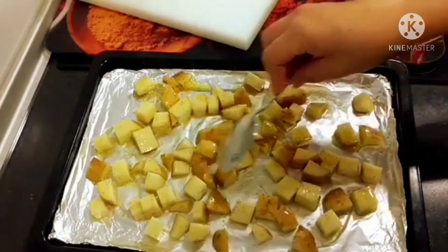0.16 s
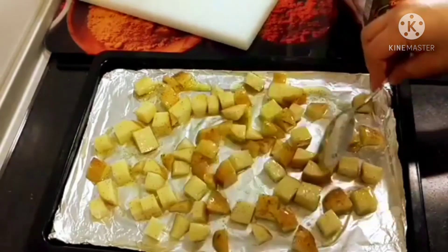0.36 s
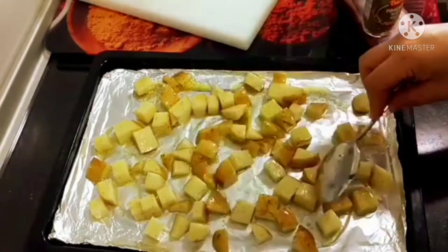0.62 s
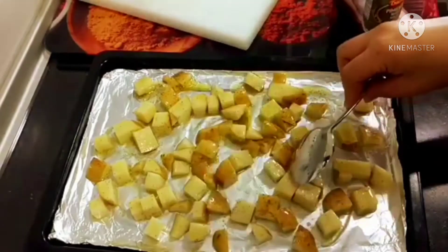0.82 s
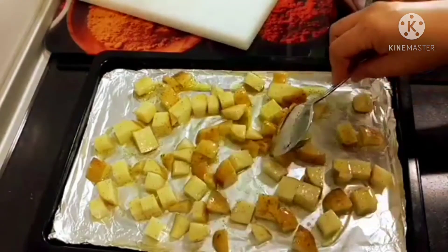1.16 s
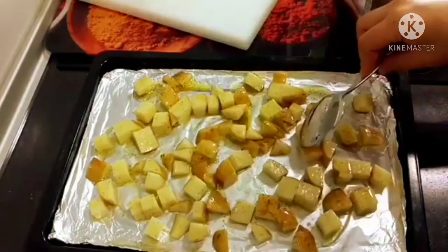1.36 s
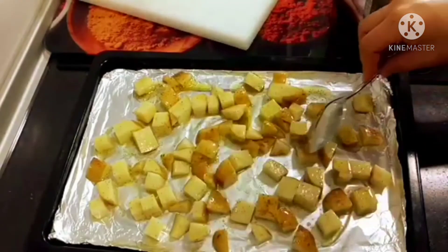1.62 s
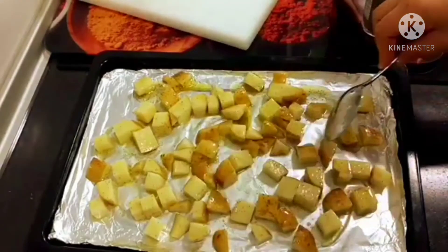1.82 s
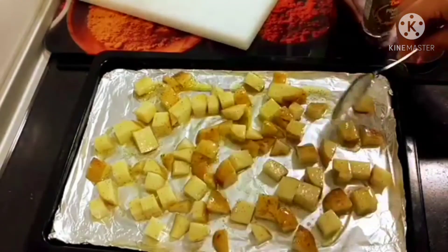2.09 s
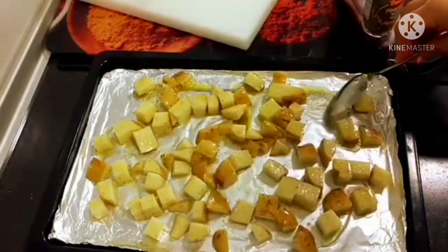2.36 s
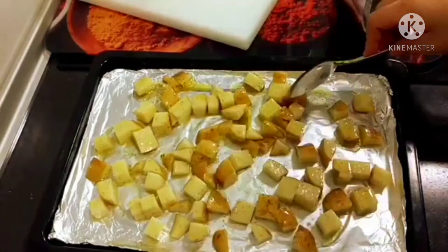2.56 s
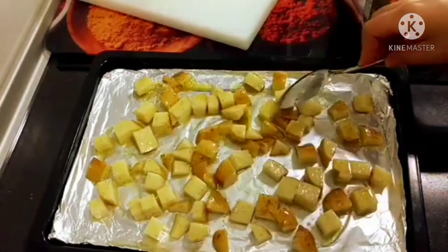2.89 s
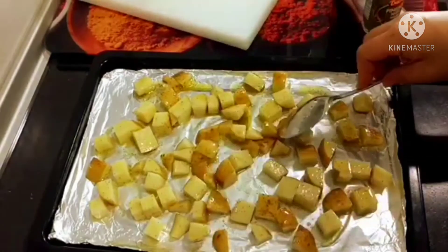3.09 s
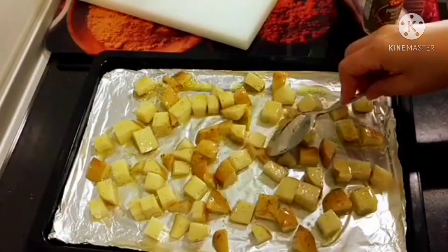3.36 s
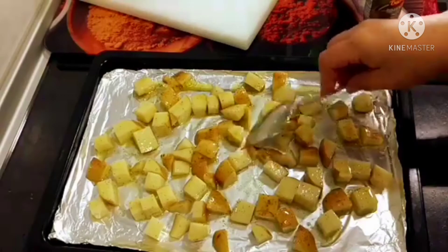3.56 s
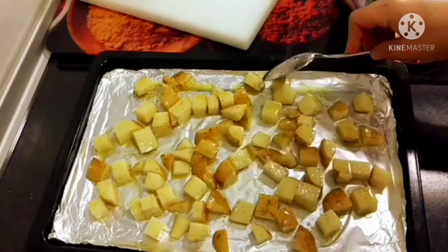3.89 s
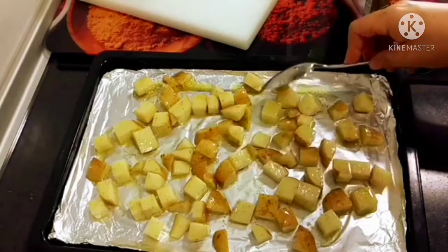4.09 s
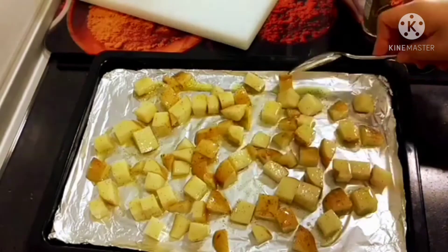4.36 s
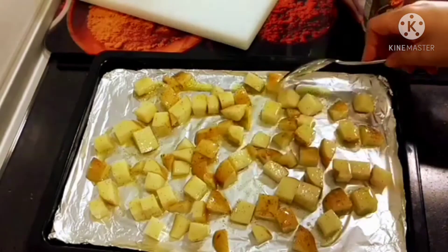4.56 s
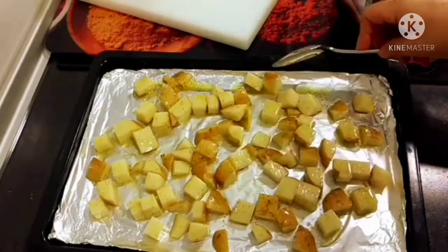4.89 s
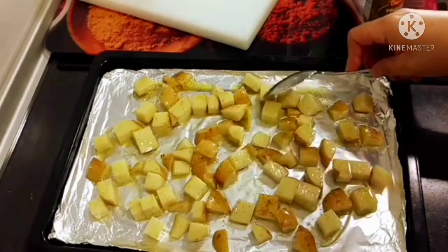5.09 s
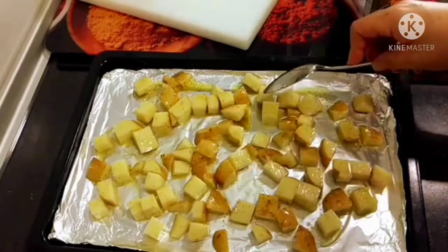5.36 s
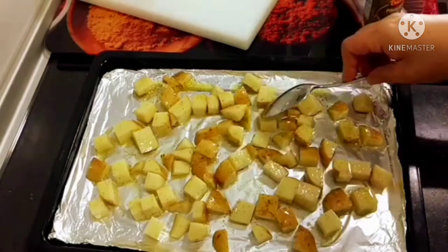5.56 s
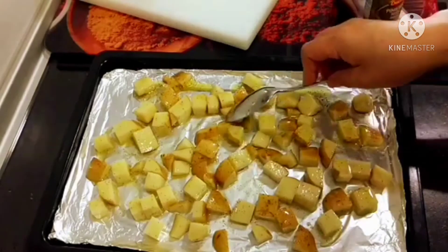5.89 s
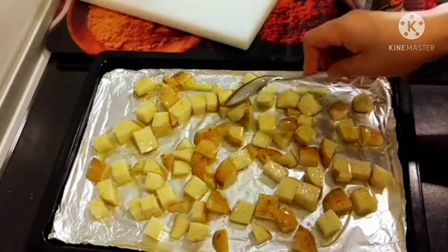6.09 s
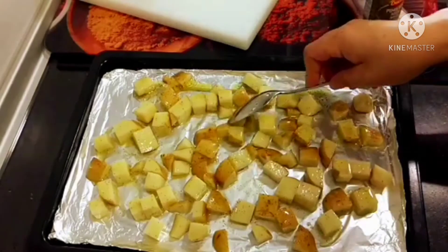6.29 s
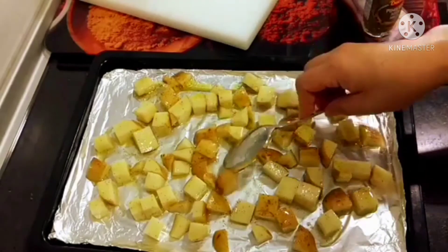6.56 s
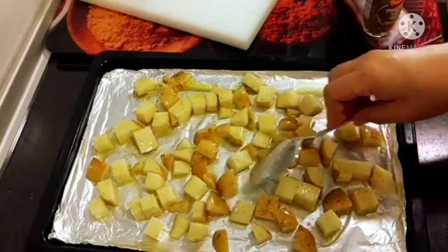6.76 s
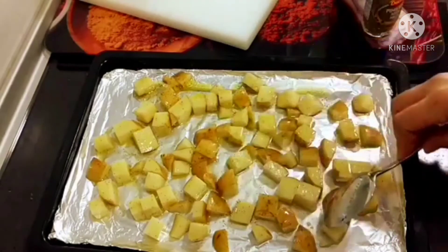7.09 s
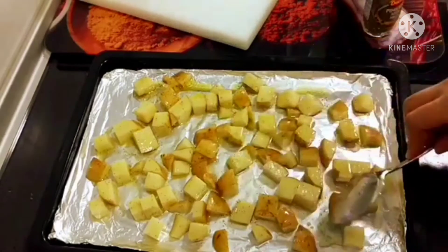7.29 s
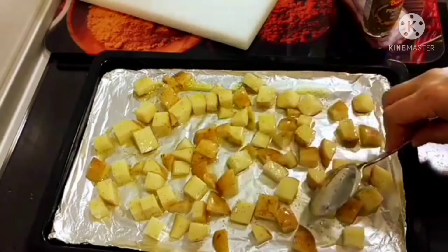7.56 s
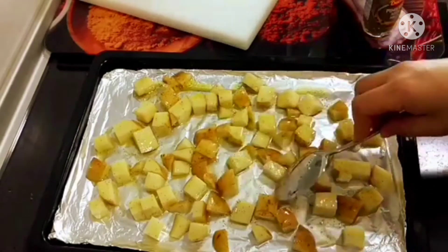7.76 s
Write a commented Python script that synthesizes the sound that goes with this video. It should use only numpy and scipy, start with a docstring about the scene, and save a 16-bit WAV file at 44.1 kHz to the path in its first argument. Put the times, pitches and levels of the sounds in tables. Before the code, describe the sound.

Hollow boomy tray knocks open, followed by irregular dull pushes, a brief judder of a sliding cube and dry foil crinkles. Foil then snaps brightly before two separate hard clacks of spoon on tray, ringing briefly with loose rattle. Faint taps follow, then a crisp foil crackle and a few last soft knocks. Close stereo pickup, short hard kitchen reverberation and low steady household hiss.

```python
"""A small, hard kitchen, a stereo microphone close to a foil-lined baking tray of potato cubes.
Over a quiet household hiss a steel spoon pushes the cubes: noise-struck modes boom, drag and knock,
while clumped grains crinkle the foil and short noise bursts snap it. Cubes judder near 1.7 s;
two sharp clacks of ringing, rattling metal follow near 4.5 and 4.9 s, within a faint thin tone.
Light spoon taps come near 6 s, then more pushes and snaps. Decaying noise echoes make the room."""
import sys
import numpy as np
from scipy import signal
from scipy.fft import rfft, irfft, next_fast_len
from scipy.io import wavfile

SR = 44100
rng = np.random.default_rng(int(sys.argv[2]) if len(sys.argv) > 2 else 0)


def inscribe(sig):
    """Save sig as 16-bit PCM at rate SR to the path in sys.argv[1].

    A 1-D sig is mono; a 2-D sig holds one channel per row.
    Samples are clipped to [-1, 1] before scaling.
    """
    pcm = np.round(np.clip(np.atleast_2d(sig).T, -1, 1) * 32767)
    wavfile.write(sys.argv[1], SR, pcm.astype(np.int16))


N = 349713
SIZE = next_fast_len(N + SR)   # room for filter and echo tails
HZ = np.maximum(np.arange(SIZE // 2 + 1) * SR / SIZE, 1)


def amp(db):
    """Gain of a dB value."""
    return 10 ** (np.asarray(db) / 20)


def rms_one(x):
    """Scale to rms 1."""
    return x / np.sqrt(np.mean(x ** 2) + 1e-20)


def in_time(rows):
    """Columns of a curve table at every sample."""
    s, *columns = np.transpose(rows)
    return [np.interp(np.arange(N) / SR, s, c) for c in columns]


def at_hz(points, hz):
    """A table read on a log-frequency axis."""
    table_hz, values = np.transpose(points)
    return np.interp(np.log(hz), np.log(table_hz), values)


def colour(x, spectrum):
    """Causal (minimum-phase) filter with the given dB spectrum."""
    cepstrum = irfft(np.log(amp(at_hz(spectrum, HZ))), SIZE)
    # folding the cepstrum forward makes the filter causal
    cepstrum[1:SIZE // 2] *= 2
    cepstrum[SIZE // 2 + 1:] = 0
    return irfft(rfft(x, SIZE) * np.exp(rfft(cepstrum)), SIZE)[..., :N]


def ring(x, hz, width_hz):
    """A two-pole resonance: a unit click sets a decaying sine of height 1 ringing."""
    r = np.exp(-np.pi * width_hz / SR)
    w = 2 * np.pi * hz / SR
    return signal.lfilter([0, np.sin(w)], [1, -2 * r * np.cos(w), r * r], x + 1e-18)


def grains(per_s, spread_db):
    """Random clicks of uneven size and sign."""
    sizes = amp(spread_db * np.minimum(rng.exponential(1, N), 5))
    signs = rng.choice([-1, 1], N)
    return sizes * signs * (rng.random(N) < per_s / SR)


def clicks(times, gains):
    """A click of each height at each time."""
    out = np.zeros(N)
    np.add.at(out, (np.asarray(times) * SR).astype(int), gains)
    return out


def strike(modes, times, gains, uneven_db, dull_db=0):
    """Each blow drives every mode with a random strength; dullness (dB per octave) favours low modes."""
    luck = rng.standard_normal((len(times), len(modes)))
    out = 0
    for k, (hz, width_hz, db) in enumerate(modes):
        octaves_up = np.log2(hz / modes[0][0])
        heights = gains * amp(db + uneven_db * luck[:, k] - dull_db * octaves_up)
        out = out + (-1) ** k * ring(clicks(times, heights), hz, width_hz)
    return out


def rub(modes, per_s, spread_db):
    """Uneven small contacts keep the modes sounding; rms 1."""
    return rms_one(sum(amp(db) * ring(grains(per_s, spread_db), hz, width_hz)
                       for hz, width_hz, db in modes))


def pair(x, lag_s, pan_db):
    """The left port hears it later by lag and louder by pan."""
    left = irfft(rfft(x, SIZE) * np.exp(-2j * np.pi * HZ * lag_s), SIZE)[:N]
    return np.array([left * amp(pan_db / 2), x * amp(-pan_db / 2)])


BUILD_UP_DB = 30   # rise during each build-up time


def gestures(s, db, build_s, hold_s, fade_db_per_s, rest_db):
    """Level of a run of gestures: each builds up, holds and fades; the strongest at the moment rules."""
    t = np.arange(0, N + 32, 32)[:, None] / SR
    early = np.maximum(s - t, 0) / np.maximum(build_s, .001)
    late = np.maximum(t - s - np.maximum(hold_s, 0), 0)
    level_db = np.max(db - BUILD_UP_DB * early - fade_db_per_s * late, axis=1)
    return np.interp(np.arange(N) / SR, t[:, 0], np.maximum(level_db, rest_db))


# spectrum of the household hiss: f/Hz, level/dB
HISS_SPECTRUM = [(15, -42), (25, -5.5), (43, -16), (139, -8.5), (387, -10.5), (777, -14.5), (1100, -16),
                 (1830, -20), (4000, -22), (5000, -18.5), (6840, -27.5), (8250, -35), (11100, -31.5),
                 (15300, -36)]
HISS_DB = -72.5
WHINE_HZ, WHINE_DB = 4931, -88.5   # a faint steady whine in the hiss


def hiss():
    """Steady coloured noise, a little to the left, different at the two ports, most opposed near 130 Hz."""
    mid, side = colour(rng.standard_normal((2, N)), HISS_SPECTRUM)
    side = colour(side, [(60, -0.5), (130, 7.5), (300, 0.5), (1000, 0)])
    noise = (mid + side * [[1], [-1]]) / np.sqrt(np.mean(mid ** 2))
    whine = amp(WHINE_DB) * rms_one(ring(rng.standard_normal((2, N)), WHINE_HZ, 12))
    return whine + amp(HISS_DB + np.array([[.3], [-1.3]])) * noise


# pushes of the spoon against the cubes:
# t/s at full force, boom level/dB, drag level/dB, build-up t/s, hold t/s
PUSHES = [(0.0, -31.5, -54.5, .02, 0.0046), (0.1, -48, -85, .05, 0.39), (0.433, -46.5, -49, .03, 0.027),
          (0.613, -50.5, -80, 0.036, 0.02), (0.692, -50.5, -80, .05, 0.046),
          (0.822, -40, -39.5, .02, 0.0083), (0.917, -45.5, -44.5, .02, 0.0074),
          (1.214, -62.5, -65, .05, 0.1), (1.375, -59, -59.5, .04, .01), (1.625, -47, -50.5, .07, 0.015),
          (1.838, -48, -67, .2, 0.05), (1.967, -45, -41, .04, 0.0061), (2.267, -57.5, -66, .05, 0.029),
          (2.345, -43.5, -43.5, 0.03, 0.028), (2.45, -49, -75, .1, 0.0077),
          (2.594, -45.5, -54.5, .04, 0.012), (2.713, -61, -69, .1, 0.11), (3.01, -64, -60, .1, 0.069),
          (3.268, -50, -48, .04, 0.065), (3.586, -61.5, -54.5, .04, 0.023), (4.078, -67, -58, .15, 0.0087),
          (4.518, -61.5, -64, .03, .05), (4.922, -46, -80, .03, 0.059), (5.075, -54, -81.5, .1, 0.096),
          (5.522, -51, -52, .04, 0.013), (5.684, -47.5, -70, .12, 0.04), (5.941, -62.5, -62, 0.38, .02),
          (6.248, -57, -61, .1, 0.06), (6.554, -56, -60.5, .06, 0.013), (7.12, -53, -51.5, .08, 0.059),
          (7.551, -52, -48, .1, 0.017), (7.833, -59.5, -65, .06, 0.0064)]
# spoon and cubes knocking the tray: t/s, peak level/dB, hardness level/dB, dullness/(dB per octave)
KNOCKS = [(0.096, -21.5, -48, 4), (0.427, -33, -13, -5.5), (0.816, -27, 6, 10), (0.917, -33, -6.5, -3.5),
          (1.619, -39.5, 2.5, 1), (1.958, -31.5, 4.5, 0.5), (2.342, -38, 14, 7.5), (2.583, -30, -20, 3),
          (3.265, -35.5, -2, -5), (3.581, -50, -5, -3), (5.51, -33, -24, 1.5), (6.544, -48.5, -18, 2),
          (7.552, -32, -17.5, -7.5), (7.819, -35.5, -1, 11)]
# low tray modes: f/Hz, width f/Hz, level/dB
TRAY_MODES = [(81.05, 21, -1.5), (140.9, 12, -1), (215.7, 35.4, -1), (307, 27.6, -11)]
BOOM_FADE_DB_PER_S, BOOM_REST_DB = 146, -73.5   # rest: faint tremor between pushes


def tray():
    """Boom under the pushes plus soft knocks that push the low modes."""
    at_s, push_db, _, build_s, hold_s = np.transpose(PUSHES)
    boom_db = gestures(at_s, push_db, build_s, hold_s, BOOM_FADE_DB_PER_S, BOOM_REST_DB)
    boom = amp(boom_db) * rub(TRAY_MODES, 160, spread_db=3.5)
    s, db = np.transpose(KNOCKS)[:2]
    return boom + strike(TRAY_MODES, s, amp(db - 9), uneven_db=2.5)


# upper tray modes: f/Hz, width f/Hz, level/dB
PANEL_MODES = [(434, 250, -2), (516, 50, -4.5), (622, 39, -8), (785, 100, -4.5), (930.6, 71, -5),
               (1190, 360, -2), (1406, 210, -5.5), (1708, 160, -5.5), (2036, 110, -8), (2490, 130, -8)]
DRAG_FADE_DB_PER_S, DRAG_REST_DB = 273, -75
DRAG_DAMPING = 3   # cubes lying on the tray widen its higher modes by this factor
HEAVY_DB, UPPER_FOLLOWS = -46.5, 0.57   # beyond this drag level these modes follow a share of the rise


def food():
    """Cubes dragged and knocked (see PUSHES, KNOCKS) over the upper tray modes."""
    at_s, _, push_db, build_s, hold_s = np.transpose(PUSHES)
    drag_db = gestures(at_s, push_db, build_s, hold_s, DRAG_FADE_DB_PER_S, DRAG_REST_DB)
    upper_db = drag_db - (1 - UPPER_FOLLOWS) * np.maximum(drag_db - HEAVY_DB, 0)
    higher_modes = np.array(PANEL_MODES[5:]) * [1, DRAG_DAMPING, 1]
    lower_modes = np.array(PANEL_MODES[:5]) * [1, 2, 1]   # widened too
    lower_drag = amp(drag_db - 9.5) * rub(lower_modes, 400, spread_db=3.0)
    higher_drag = amp(upper_db - 15.0) * rub(higher_modes, 400, spread_db=3.0)
    s, db, hard_db, dull_db = np.transpose(KNOCKS)
    knocks = strike(PANEL_MODES, s, amp(db + hard_db - 10), uneven_db=3, dull_db=dull_db)
    return lower_drag + higher_drag + knocks


# strokes that crinkle the foil:
# t/s at full pressure, level/dB, build-up t/s, hold t/s, fade/(dB per s)
STROKES = [(0.005, -60, 0.0046, 0.0027, 306), (0.129, -61.5, 0.033, .01, 170),
           (0.434, -63, 0.038, .03, 200), (0.489, -48, 0.03, .05, 300), (0.536, -43.5, .004, .03, 319.5),
           (0.818, -54, 0.011, 0.0074, 169), (0.915, -55.5, 0.036, .01, 182), (1.087, -63, 0.036, .01, 264),
           (1.229, -58.5, 0.037, 0.036, 250), (1.29, -58, 0.03, 0.037, 148), (1.62, -63.5, 0.053, .01, 112),
           (1.961, -63.5, 0.031, .01, 91), (2.339, -50.5, 0.032, 0.012, 300),
           (2.589, -54, 0.014, 0.0045, 295), (2.665, -53.5, 0.0067, 0.027, 208),
           (2.802, -56, .01, 0.009, 164), (3.003, -59.5, 0.019, 0.037, 123),
           (3.323, -49, 0.085, 0.0067, 236), (3.595, -73, .06, .02, 90), (3.975, -43.5, 0.0027, 0.032, 300),
           (4.021, -40.5, 0.042, 0.069, 700), (4.202, -49.5, 0.0081, 0.0059, 228),
           (4.254, -40.5, 0.013, 0.0021, 415), (4.488, -46, 0.0084, 0.0052, 306),
           (5.512, -70.5, 0.054, 0.018, 72), (5.781, -58.5, 0.0047, 0.0028, 333),
           (5.916, -69, 0.13, 0.14, 280.5), (6.211, -69.5, 0.025, 0.0039, 400),
           (6.265, -65.5, 0.075, .005, 200), (6.572, -65.5, 0.079, .01, 240),
           (7.097, -58.5, 0.036, .02, 300), (7.118, -39, .003, 0.0074, 200),
           (7.136, -35, 0.0037, 0.034, 242), (7.494, -61.5, .006, .01, 197),
           (7.533, -50, 0.056, 0.046, 207), (7.581, -43.5, 0.083, 0.0068, 353),
           (7.828, -63, .006, 0.0087, 191)]
# spectrum of the crinkle: f/Hz, level/dB
CRINKLE_SPECTRUM = [(410, -53.5), (700, -30), (1800, -16), (2100, -16), (2510, -9), (3170, -6), (3510, -2),
                    (5240, 6), (6440, 3), (8780, -11), (15300, -5.5)]
CRINKLE_REST_DB = -81.5
PATCHY_DB, TICK_DB = 3.5, -13   # swelling of each resonance; sparse sharp ticks among the creases


def crinkle():
    """Clumped tiny creases feed short resonances that swell and fade; each port hears its own share."""
    level_db = gestures(*np.transpose(STROKES), CRINKLE_REST_DB)
    pitches = np.geomspace(900, 14000, 14)
    clumps = amp(5 * rms_one(ring(rng.standard_normal(N), 30, 80)))
    patches = [amp(PATCHY_DB * rms_one(ring(rng.standard_normal(N), 8, 25))) for hz in pitches]
    parts = []
    for part in range(3):
        dense = grains(4500 * clumps, spread_db=2.5)
        dealt = rng.integers(0, 14, N)   # which resonance each crease excites
        parts.append(sum(ring(dense * (dealt == k) * patches[k], hz, 0.35 * hz)
                         for k, hz in enumerate(pitches)))
    shared, *own = rms_one(colour(np.array(parts), CRINKLE_SPECTRUM))
    ticks = rms_one(colour(grains(250 * clumps, spread_db=3.5), CRINKLE_SPECTRUM))
    sheet = shared + 1.55 * np.array(own) + amp(TICK_DB) * ticks
    return amp(level_db - 6.0 + np.array([[.4], [-.4]])) * sheet


# single foil creases snapping: t/s, peak level/dB, pitch f/Hz, fizz level/dB
SNAPS = [(0.5446, -26, 6000, -17.5), (0.8247, -40, 5530, -24), (0.918, -46, 5530, -26),
         (1.2985, -49, 6390, -24), (1.9666, -42.5, 4160, -23), (2.3431, -36, 3860, -26),
         (2.592, -44, 6370, -26), (2.6754, -47, 5540, -27), (2.803, -57.5, 4560, 1),
         (3.0084, -49, 5090, -32), (3.263, -47.5, 4450, -25), (3.3215, -48, 5160, -24),
         (3.9767, -23, 6050, -13), (4.037, -37, 4370, -29), (4.078, -38, 5050, -24),
         (4.208, -43, 5750, -28), (4.2523, -39, 4300, -5.5), (4.4886, -48.5, 3520, -6),
         (4.646, -37.5, 5600, -21), (7.119, -46, 4730, -23), (7.1416, -24.5, 5650, -11),
         (7.1637, -26.5, 6600, -13), (7.208, -32.5, 6430, -27), (7.5628, -39, 5400, -22),
         (7.5956, -42, 4930, -16), (7.8226, -49, 4840, -31)]


def foil_snaps():
    """Each loud snap is one sharp tick and a brief tearing tail, heard as a tone plus treble fizz."""
    snaps = np.zeros(N)
    t = np.arange(int(.03 * SR)) / SR
    bursts = rng.standard_normal((len(SNAPS), len(t))) * .3 * np.exp(-t / .004)
    bursts[:, 0] = 1.5   # the tick
    treble = signal.butter(4, 7500, "high", fs=SR, output="sos")
    for (s, db, hz, fizz_db), burst in zip(SNAPS, bursts):
        tone = ring(ring(np.diff(burst, prepend=0), hz, .45 * hz), hz, .45 * hz)
        fizz = signal.sosfilt(treble, burst * np.exp(-t / .003))
        snap = tone / np.abs(tone).max() + amp(fizz_db + 12) * fizz / np.abs(fizz).max()
        i = int(s * SR)
        snaps[i:i + len(t)] += amp(db) * snap[:N - i]
    return snaps


# a cube juddering across the tray: t/s, level/dB
JUDDER = [(1.72, -71), (1.782, -58), (1.822, -51), (1.93, -68), (1.969, -52)]
# modes it excites: f/Hz, width f/Hz, level/dB
JUDDER_MODES = [(440, 60, 0.5), (530, 60, -4), (750, 200, -6)]


def judder():
    """Rapid even contacts of a cube rub three modes while the level swells and dips."""
    before, after = (JUDDER[0][0] - .02, -100), (JUDDER[-1][0] + .02, -100)
    level_db, = in_time([before] + JUDDER + [after])
    return amp(level_db) * rub(JUDDER_MODES, 500, spread_db=0.0)


# a faint thin tone that hangs around the clacks: t/s, level/dB
TONE = [(4.4, -85), (4.55, -74), (5.202, -74), (5.4, -87)]
TONE_HZ, TONE_WAVERS_DB = 773, 3


def thin_tone():
    """A sine whose level wavers at random, only within the span of its table."""
    t = np.arange(N) / SR
    wavers_db = TONE_WAVERS_DB * rms_one(ring(rng.standard_normal(N), 5, 10))
    sounding = (t >= TONE[0][0]) & (t <= TONE[-1][0])
    return amp(in_time(TONE)[0] + wavers_db) * np.sin(2 * np.pi * TONE_HZ * t) * sounding


# sharp clacks of metal: t/s, peak level/dB, rattle level/dB, rattle length t/s
CLACKS = [(4.5344, -23, -16.5, 0.036), (4.916, -15.5, -15.5, 0.12)]
# short steel modes: f/Hz, width f/Hz, level/dB at the first clack, level/dB at the second
STEEL_MODES = [(520, 19, -22.5, -27), (1004, 210, -10.5, -32), (1650, 110, -14.5, 1),
               (2160, 140, -10.5, -10), (2540, 130, -11, 5), (3760, 250, -8, -8), (4240, 220, -2.5, -2.5),
               (4560, 190, -6.5, 1.5), (6000, 160, -3, -7)]
# longer rings: f/Hz, width f/Hz, level/dB at the first clack, level/dB at the second
RING_MODES = [(1163, 9, -16, -36.5), (1525, 10, -21, -41), (1615, 12, -18, -34), (1775, 14, -39.5, -22),
              (1985, 12, -34, -22), (2250, 10, -18, -37.5), (2575, 12, -23.5, -20), (3623, 10, -33, -23),
              (4287, 15, -30, -26.5), (4877, 12, -29, -40.5)]
# spectrum of the broad crack and rattle, one list for each clack: f/Hz, level/dB
CRACK_SPECTRA = [
    [(120, -51.5), (200, -14), (824, -10), (1160, -6), (1340, -11), (1580, -2.5), (2400, -5.5),
     (3000, -15.5), (4300, -5), (6500, -21.5), (13700, -31), (15300, -57.5)],
    [(120, -31.5), (200, -8), (258, -14), (752, -12), (1370, -10), (1730, 2.5), (2230, -2.5), (3200, -6.5),
     (4540, 0.5), (7400, -18), (15300, -28.5)],
]
REBOUND_S, REBOUND_GAIN_DB = .0017, 2.5   # the spoon touches twice, harder the second time
JOLT_DB = -19   # the rattle keeps jolting the rings
RATTLE_TAIL_DB, RATTLE_TAIL_S = -18, .055   # the tray shivers on after the rattle


def clacks():
    """Steel modes struck twice, a noise crack, thin rings kept going by jolts, a rattle of the loose tray."""
    s, db = np.transpose(CLACKS)[:2]
    blow = sum(ring(clicks(s, amp(db + levels_db)), hz, width_hz) * (-1) ** k
               for k, (hz, width_hz, *levels_db) in enumerate(STEEL_MODES))
    blow = blow + amp(REBOUND_GAIN_DB) * np.roll(blow, int(REBOUND_S * SR))
    crack, rattle, jolts = 0, 0, []
    for (start, peak_db, rattle_db, length), spectrum in zip(CLACKS, CRACK_SPECTRA):
        t = np.arange(N) / SR - start
        begun = t >= 0
        shared, *own = rms_one(colour(np.array([grains(3000, spread_db=2.5) for part in range(3)]),
                                      spectrum))
        crack = crack + amp(peak_db - 3.5) * begun * np.exp(-np.abs(t) / 0.0094) * shared
        body = np.exp(-(t / length) ** 4)
        tail = amp(RATTLE_TAIL_DB) * np.exp(-np.maximum(t - length, 0) / RATTLE_TAIL_S)
        bits = .75 * np.array(own) + .4 * shared
        rattle = rattle + amp(peak_db + rattle_db) * begun * (body + tail) * bits
        shaking = np.array([grains(300, spread_db=3.0) for port in range(2)])
        shaking = amp(JOLT_DB) * begun * body * shaking
        jolts.append(amp(peak_db) * (clicks([start], 0.81) + shaking))
    rings = sum(ring(np.tensordot(amp(levels_db), jolts, axes=1), hz, width_hz)
                for hz, width_hz, *levels_db in RING_MODES)
    return blow, crack, rings, rattle


# the spoon bowl tapping lightly: t/s, peak level/dB, dullness/(dB per octave)
TINKS = [(5.785, -50, 2), (6.083, -73, -7), (6.203, -66, 1), (6.272, -72, -7)]
# spoon modes: f/Hz, width f/Hz, level/dB
SPOON_MODES = [(1860, 120, -2), (2600, 80, -3), (3000, 90, -4), (3660, 70, -5), (4540, 80, 0),
               (5390, 70, -1)]


def spoon():
    """Light taps set the spoon's own modes ringing briefly; each contact scuffs for a few milliseconds."""
    s, db, dull_db = np.transpose(TINKS)
    scuff = rng.standard_normal(600) * np.exp(-np.arange(600) / SR / .004)
    taps = strike(SPOON_MODES, s, amp(db), uneven_db=4, dull_db=dull_db)
    return signal.fftconvolve(taps, scuff / np.linalg.norm(scuff))[:N]


# time the kitchen takes to die away by 60 dB: f/Hz, t/s
ROOM_T60 = [(150, 0.449), (1000, 0.33), (4000, 0.37), (12000, 0.31)]


def kitchen(x):
    """Dense noise echoes dying band by band, alike at the two ports only in the bass."""
    t = np.arange(int(.9 * SR)) / SR
    edges, echoes = np.geomspace(60, 16000, 9), 0
    for low, high in zip(edges, edges[1:]):
        band_pass = signal.butter(2, [low, high], "band", fs=SR, output="sos")
        mid, side = signal.sosfilt(band_pass, rng.standard_normal((2, len(t))))
        band = mid + side * min(1, low / 350) * np.array([[1], [-1]])
        echoes = echoes + band * amp(-60 * t / at_hz(ROOM_T60, np.sqrt(low * high)))
    echoes = echoes * (1 - np.exp(-t / 0.00072))   # the echoes set in softly, within a few milliseconds
    echoes = echoes / np.sqrt(np.sum(echoes ** 2, axis=1, keepdims=True))
    return irfft(rfft(x, SIZE) * rfft(echoes, SIZE), SIZE)[:, :N]


def scene():
    """Close sounds placed between the ports, plus room; the left port is a little more sensitive."""
    low, middle = tray(), food() + judder()
    creases = crinkle()
    snaps = foil_snaps() + spoon()
    tone = thin_tone()
    blow, crack, rings, rattle = clacks()
    near = pair(low, .00003, 0.8) + pair(middle, .00004, -1.5)
    near = near + pair(snaps, -.000012, 1.0) + pair(blow + crack, 0.0002656, 0.84)
    to_room = amp(-13.0) * low + amp(-2.5) * middle + amp(-10) * (snaps + creases[0])
    to_room = to_room + amp(-11.0) * blow + amp(-3.5) * crack + amp(-4.0) * rattle[0]
    total = near + creases + rings + tone + rattle + kitchen(to_room) + hiss()
    return total * amp([[.6], [-.6]])


CUTOFF_HZ = 15300


def record(dry):
    """The microphone drops the deepest bass; the top is cut steeply."""
    bass_cut = signal.sosfilt(signal.butter(2, 50, "high", fs=SR, output="sos"), dry)
    return signal.sosfilt(signal.ellip(8, .5, 60, CUTOFF_HZ, fs=SR, output="sos"), bass_cut)


dry = scene()
out = record(dry)
inscribe(out)
```